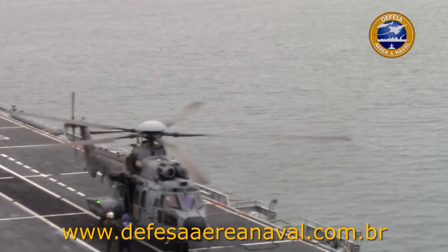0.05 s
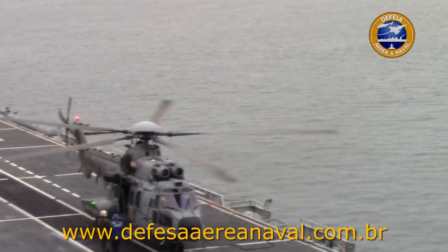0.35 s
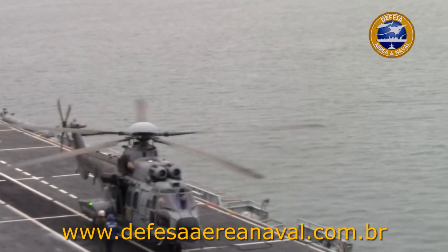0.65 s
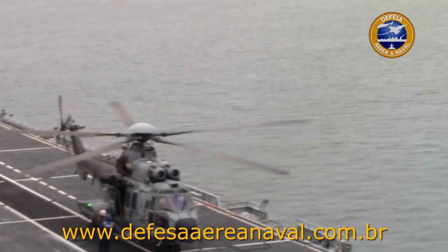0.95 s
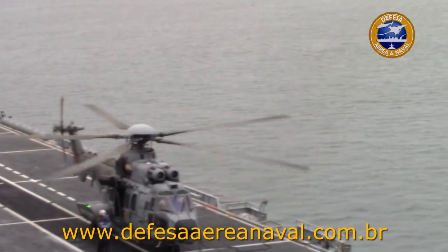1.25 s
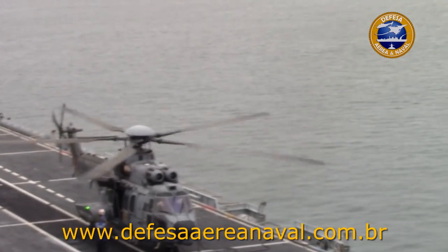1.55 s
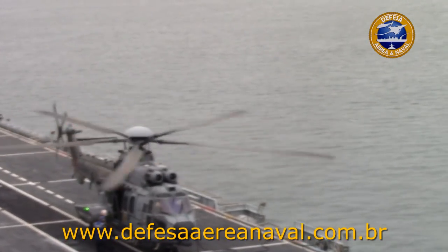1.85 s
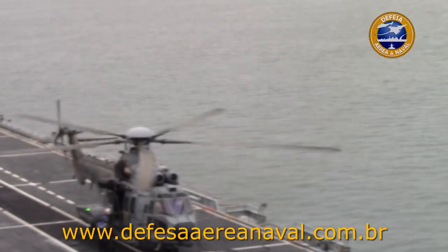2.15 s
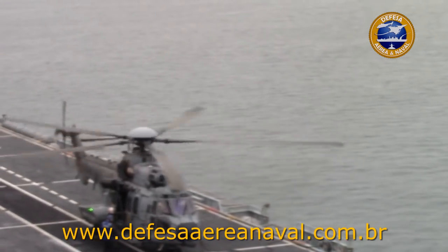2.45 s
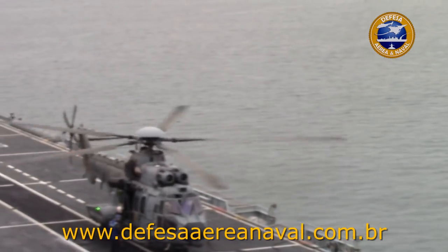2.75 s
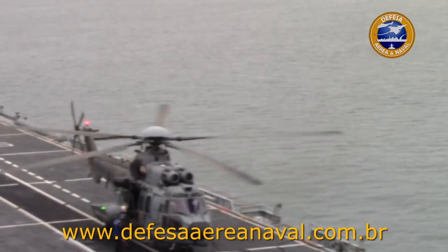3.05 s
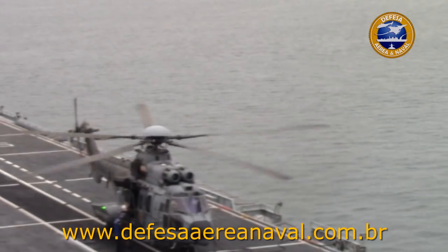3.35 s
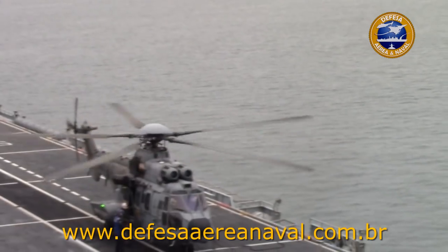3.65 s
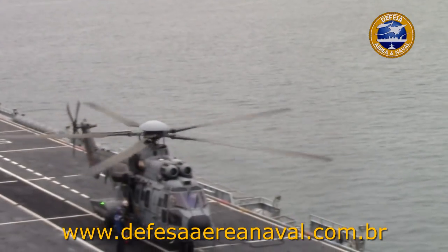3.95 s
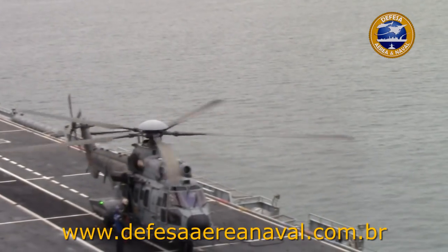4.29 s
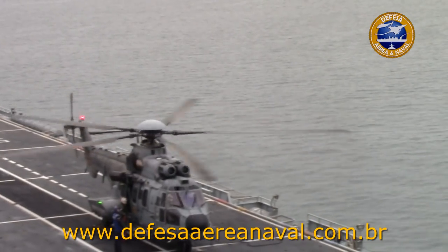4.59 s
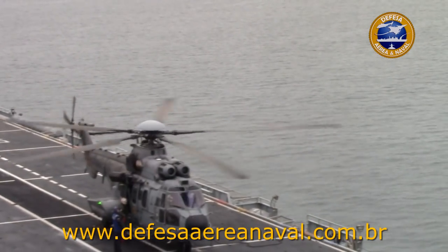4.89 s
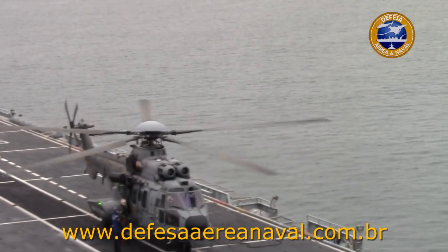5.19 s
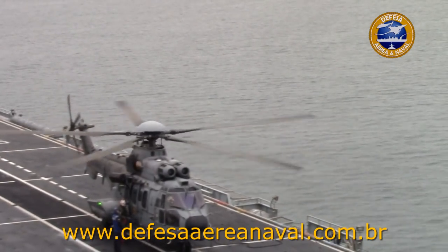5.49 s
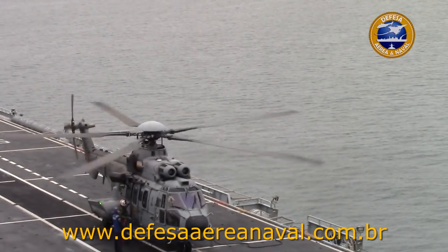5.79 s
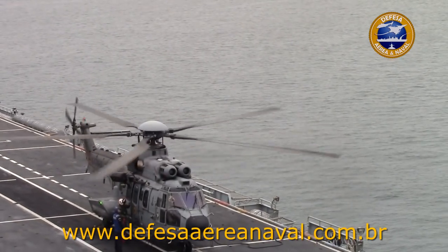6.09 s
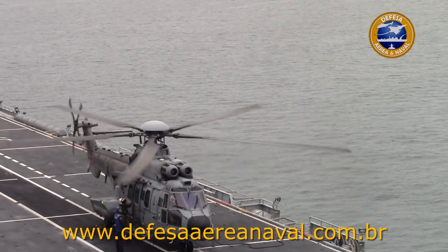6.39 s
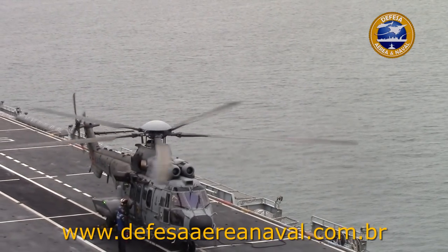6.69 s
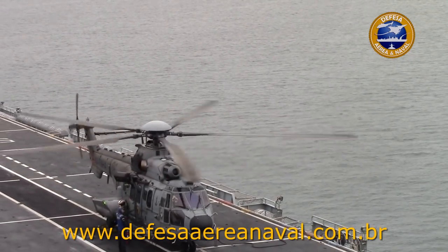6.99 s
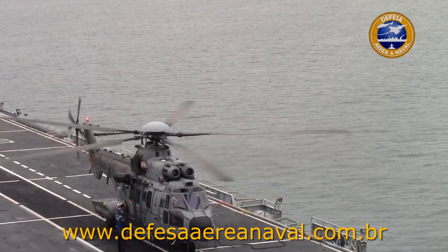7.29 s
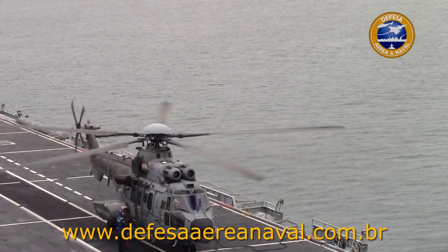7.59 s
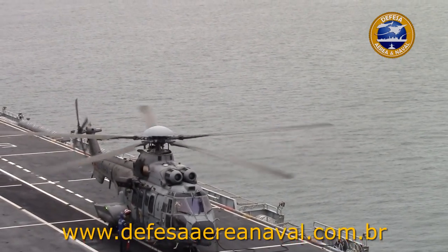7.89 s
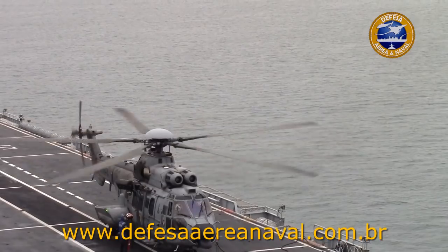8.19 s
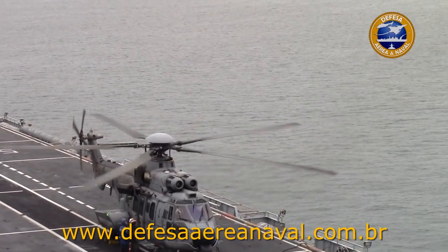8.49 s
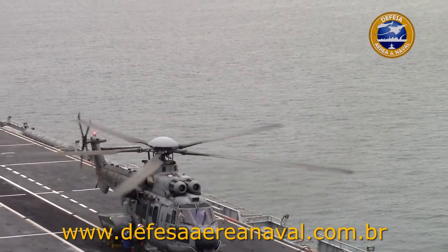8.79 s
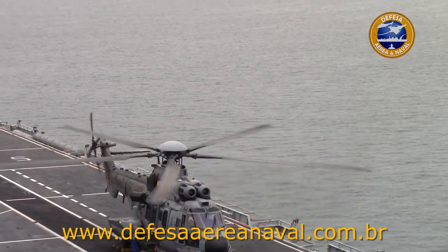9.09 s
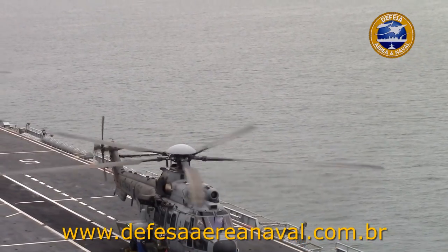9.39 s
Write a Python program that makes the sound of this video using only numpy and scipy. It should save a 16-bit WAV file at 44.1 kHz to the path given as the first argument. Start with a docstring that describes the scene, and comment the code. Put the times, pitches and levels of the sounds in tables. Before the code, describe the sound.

Outdoors on a flight deck, a big helicopter runs in place at a moderate distance from the microphone. A loud, continuous turbine rush carries a rapid rotor flutter and a piercing high whine that wavers in the moving air. Short whistling tones flare over the blades now and then. Past the middle, the rotor slaps more sharply for a couple of seconds, then eases while the engines keep running.

```python
"""Helicopter idling on a ship's deck.

A large twin-turbine machine, some way off. The exhausts roar, each main blade sweeps past
with a swish or a slap, and the rotors drone below. Air sings over the rotor; gears hum.
The compressors whine through gusty air; passing blades throw the whine back in raised chirps."""
import sys
import numpy as np
from scipy import signal
from scipy.fft import rfft, irfft, next_fast_len
from scipy.io import wavfile
from scipy.ndimage import uniform_filter1d, map_coordinates

SR = 44100
rng = np.random.default_rng(int(sys.argv[2]) if len(sys.argv) > 2 else 0)


def store_wav(level_fs):
    """Save 16-bit WAV to argv[1]."""
    pcm = np.round(np.clip(np.atleast_2d(level_fs), -1, 1) * 32767)
    wavfile.write(sys.argv[1], SR, pcm.T.astype(np.int16))


N = 425565
TIME_S = np.arange(N) / SR
BLADE_HZ, TAIL_HZ = 22.925, 88.5  # blade-pass rates: main rotor, tail rotor

# low roar, exhaust jets, turbine hiss: freq_hz, density_db
ROAR_SPECTRUM = [(130, -64), (190, -44), (300, -15.5), (470, -12.5), (570, -8.5), (680, -0.5), (830, -1.8),
                 (1080, -1), (1300, -1.5), (1700, -15.5), (3000, -69.5)]
JET_SPECTRUM = [(700, -59), (1250, -11.5), (1530, -0.5), (1830, -2), (2250, 0), (2950, -2.5), (3400, -2.5),
                (3750, -7.5), (4500, -12), (7000, -42)]
HISS_SPECTRUM = [(2000, -43), (3700, -3.5), (4600, -1.5), (5800, 0), (7200, -0.9), (8500, 0.3), (9300, 2),
                 (9900, -3), (11000, -7), (12500, -15), (14300, -23.5), (15500, -50)]
# envelope of low roar and rotor drone: time_s, level_db
LOW_ENVELOPE = [(0.0, -27.5), (0.2, -27.5), (0.45, -32.5), (1.07, -29.5), (1.42, -32), (1.8, -31.5),
                (2.55, -27.5), (3.3, -26.5), (4.15, -25.5), (4.75, -31), (5.4, -27.5), (6.1, -28),
                (6.2, -26), (6.35, -26.5), (7.0, -28.5), (7.68, -31.5), (8.03, -27), (8.4, -29),
                (8.72, -32), (9.2, -28.5), (9.65, -26)]
# part of the rush's power that comes in swishes: time_s, body_share, treble_share
SWISH_SHARE = [(0.0, .22, 0.2), (0.65, 0.16, .12), (1.0, .07, .15), (1.5, 0.11, 0.04), (2.25, 0.06, 0.15),
               (2.75, .12, .18), (3.05, .16, .12), (3.33, 0.22, .4), (3.75, .04, 0.26), (4.2, 0.22, 0.1),
               (4.52, 0.3, 0.3), (4.75, .16, .08), (5.05, .26, .26), (5.4, 0.16, .15), (6.25, 0.2, .16),
               (6.55, 0.45, 0.45), (7.25, .52, .45), (7.55, .22, .3), (7.85, 0.33, .19), (8.35, 0.34, 0.36),
               (8.7, 0.23, 0.2), (9.1, .1, 0.3), (9.45, .08, .1), (9.65, .15, .3)]
# early and late drift of the swishes: time_s, lag_periods
SWISH_DRIFT = [(0.0, .04), (2.8, .08), (3.35, .02), (4.0, .04), (5.0, .04), (5.25, -.04), (5.6, .04),
               (6.3, .06), (6.65, .115), (7.1, .025), (7.5, .01), (7.9, -.08), (8.2, -.01), (8.4, -.03),
               (9.05, .13), (9.65, .03)]
# compressor blade tones: time_s, first_engine_hz, second_engine_hz
COMPRESSOR_PITCH = [(0.0, 9276, 8834), (0.7, 9278, 8812), (1.2, 9272, 8814), (2.4, 9287, 8813),
                    (3.6, 9266, 8828), (6.0, 9273, 8830), (6.8, 9248, 8824), (7.8, 9238, 8824),
                    (8.8, 9254, 8826), (9.6, 9265, 8823)]


def amp(db):
    """Decibels to gain."""
    return 10 ** (np.asarray(db) / 20)


def unit(x):
    """Scale to rms 1."""
    return x / np.sqrt(np.mean(x ** 2) + 1e-20)


def along(points, hz):
    """Interpolate (freq_hz, value) points on a log axis."""
    freq_hz, values = np.transpose(points)
    return np.interp(np.log(hz + 1), np.log(freq_hz + 1), values)


def curves(rows):
    """One per-sample curve for each column after time_s."""
    time_s, *columns = np.transpose(rows)
    return [np.interp(TIME_S, time_s, column) for column in columns]


def bell(peak_s, length_s):
    """Bell of height 1, length_s wide at half height."""
    return np.exp2(-np.minimum((2 * (TIME_S - peak_s) / length_s) ** 2, 40))


def swells(rows):
    """Bell-shaped rise in dB per (peak_s, length_s, lift_db) row."""
    return sum(lift_db * bell(peak_s, length_s) for peak_s, length_s, lift_db in rows)


def bursts(rows, length_s):
    """Bell-shaped gain per (peak_s, level_db) row."""
    return sum(amp(level_db) * bell(peak_s, length_s) for peak_s, level_db in rows)


def wobble(rate_hz):
    """Smooth random curve, rate_hz knots a second."""
    knots = rng.standard_normal(int(N * rate_hz / SR) + 4)
    steps = np.linspace(0, len(knots) - 1, 10 * len(knots))
    return np.interp(TIME_S * rate_hz, steps, map_coordinates(knots, [steps], mode="mirror"))


def filtered(x, response):
    """Apply the gain response(hz)."""
    size = next_fast_len(N + SR // 4)
    return irfft(rfft(x, size) * response(np.fft.rfftfreq(size, 1 / SR)), size)[..., :N]


def rush(spectrum, patchy_db):
    """Stereo noise of rms 1; turbulence lifts and sinks patches of its spectrum."""
    # left-right likeness: freq_hz, correlation
    likeness = [(70, 0.9), (200, .99999), (900, 1), (1400, 1), (2000, 1), (4000, 0.932), (8000, 0.63),
                (12000, 0.5)]

    def mid_side_gains(hz):
        angle = np.arccos(np.clip(along(likeness, hz), -1, 1)) / 2
        return amp(along(spectrum, hz)) * [np.cos(angle), np.sin(angle)]

    bins = signal.stft(rng.standard_normal((2, N)), nperseg=1024)[2]
    patches = uniform_filter1d(rng.standard_normal(bins.shape[1:]), size=5, axis=0)
    patches = uniform_filter1d(patches, size=24, axis=1)
    pair = signal.istft(bins * amp(patchy_db * unit(patches)), nperseg=1024)[1][:, :N]
    mid, side = filtered(pair, mid_side_gains)
    return unit(np.array([mid + side, mid - side]))


def tone(hz, scatter, rate_hz):
    """Tone of rms 1: a direct part plus a part scattered by moving air."""
    phase = 2 * np.pi * np.cumsum(hz + np.zeros(N)) / SR
    in_phase = (1 + scatter * wobble(rate_hz)) * np.cos(phase)
    quadrature = scatter * wobble(rate_hz) * np.sin(phase)
    return unit(in_phase + quadrature)


def blade_pass(lag_periods, width_periods):
    """One bump per main blade, mean 1."""
    phase = 2 * np.pi * (BLADE_HZ * TIME_S - lag_periods)
    bump = np.exp((np.cos(phase) - 1) / (2 * np.pi * width_periods) ** 2)
    return bump / bump.mean()


def chop(share, lag_periods, width_periods):
    """Power of the blade strokes: crisp slap, softer wake, no two equal."""
    wake_share = 0.31
    slap = (1 - wake_share) * blade_pass(lag_periods, width_periods)
    wake = wake_share * blade_pass(lag_periods + 0.09, width_periods=0.18)
    return share * (slap + wake) * amp(0.76 * wobble(BLADE_HZ)) ** 2


def exhaust_and_swish(gust_db):
    """Broad engine rush; part of its power comes in one swish per main blade."""
    # exhaust jets and turbine hiss between gusts: time_s, level_db
    jet_envelope = [(0.0, -23), (0.26, -21.5), (0.5, -24.5), (0.7, -24.2), (0.95, -22.8), (1.1, -23),
                    (1.58, -21), (1.73, -24.5), (1.85, -20.5), (1.95, -21.5), (2.09, -20), (2.2, -22),
                    (2.45, -23.5), (3.2, -23), (3.37, -23), (3.55, -23.2), (3.66, -21.7), (3.85, -23.3),
                    (4.4, -21.8), (4.85, -22.7), (5.95, -24), (6.27, -22), (6.5, -23.5), (7.1, -23.5),
                    (7.7, -23.5), (8.0, -23), (8.17, -24), (8.33, -22.3), (8.52, -25.3), (8.85, -25.5),
                    (9.3, -23.5), (9.5, -22.5), (9.65, -24)]
    hiss_envelope = [(0.0, -24), (0.16, -23.2), (0.45, -26), (0.7, -24), (1.05, -22), (1.19, -20.5),
                     (1.4, -22), (1.78, -23.5), (2.1, -22.5), (3.3, -23), (3.9, -22), (4.5, -21.5),
                     (4.85, -22.8), (5.15, -21.5), (5.4, -22.5), (5.62, -21.5), (6.05, -23.3), (6.38, -21),
                     (6.7, -23.5), (7.25, -21.8), (8.05, -24), (8.5, -23.5), (8.78, -23.5), (9.22, -24),
                     (9.65, -22)]
    # blade swish: freq_hz, density_db
    swish_spectrum = [(200, -45), (480, -16.5), (670, -2.5), (870, -7.5), (1060, -1), (1300, -8),
                      (1550, 0.5), (1850, -5), (2300, -3.5), (2900, -3.5), (3400, -3.5), (4400, -12),
                      (7000, -40)]
    jet_db = curves(jet_envelope)[0] + 0.023 * gust_db
    hiss_db = curves(hiss_envelope)[0] + 0.11 * gust_db
    share, treble_share = np.clip(curves(SWISH_SHARE), 0, 0.8)
    lag_periods, = curves(SWISH_DRIFT)
    flutter = amp(0.22 * wobble(9))
    roar = amp(curves(LOW_ENVELOPE)[0] + 0.3) * rush(ROAR_SPECTRUM, patchy_db=1.1)
    jet = amp(jet_db + 1.53 + 0.26 * wobble(9.3)) * rush(JET_SPECTRUM, patchy_db=1.15)
    hiss = amp(hiss_db + 0.27 + 0.29 * wobble(7.2)) * rush(HISS_SPECTRUM, patchy_db=1.76)
    body_power = chop(share, lag_periods, width_periods=0.086)
    swish = amp(jet_db + 1.87) * np.sqrt(body_power) * rush(swish_spectrum, patchy_db=1)
    treble_power = 1 - treble_share + chop(treble_share, lag_periods + 0.025, width_periods=0.087)
    return flutter * (np.sqrt(1 - share) * (roar + jet) + swish + np.sqrt(treble_power) * hiss)


def rotor_drone(blade_hz, gain_db, half_width_hz):
    """Blade-rate harmonics, each blurred by the wind to a narrow, wavering line."""
    # outline of the harmonics: freq_hz, level_db
    outline = [(100, -90), (155, -28), (183, -12.5), (228, -4), (320, 1), (390, -1), (460, -5), (640, 3),
               (800, -2), (1200, -71.5)]

    def harmonics(hz):
        offset_hz = (hz + blade_hz / 2) % blade_hz - blade_hz / 2
        return amp(along(outline, hz)) / (1 + (offset_hz / half_width_hz) ** 2)

    return amp(curves(LOW_ENVELOPE)[0] + gain_db) * unit(filtered(rng.standard_normal(N), harmonics))


def compressors(gust_db):
    """Two engines whine at slightly different speeds, swelling in gusts; rotor wash frays the first."""
    # whine between gusts: time_s, first_engine_db, second_engine_db
    envelopes = [(0.0, -29, -40), (0.7, -31, -38), (1.5, -28.5, -33.5), (2.2, -29, -34), (3.0, -36, -34),
                 (3.6, -31.5, -39), (4.2, -29.5, -41), (7.0, -26.9, -41.5), (8.0, -28.2, -44),
                 (9.65, -29, -38)]
    # whine scattered by turbulence: freq_hz, density_db
    halo_spectrum = [(8300, -41.5), (8900, -6), (9150, -5), (9265, 3.5), (9400, -7), (9650, -19),
                     (10200, -46)]
    first_db, second_db = curves(envelopes)
    first_hz, second_hz = curves(COMPRESSOR_PITCH)
    first_hz += 5 * wobble(20)
    direct = 0.86 * tone(first_hz, scatter=0.42, rate_hz=55)
    frayed = 0.45 * np.array([tone(first_hz, scatter=4.2, rate_hz=130) for _ in range(2)])
    halo = amp(-8) * rush(halo_spectrum, patchy_db=1)
    first = amp(first_db + gust_db + 1.55 * wobble(28)) * (direct + frayed + halo)
    second_gain = amp(second_db + 0.7 * gust_db + 2 * wobble(13))
    second = second_gain * tone(second_hz + 4 * wobble(8), scatter=0.56, rate_hz=50)
    return (first + second) * amp([[1.2], [-1.2]])  # slightly left


def machinery():
    """Thin tones of gear meshes, most with one slow swell, and of further turbine stages."""
    # gear meshes: pitch_hz, level_db, peak_s, length_s, lift_db
    meshes = [(979, -46, 4.2, 1.6, 2), (1073, -47.5, 6.9, 1.0, 5), (1910, -43, 2.4, 1.2, 4),
              (2195, -42.5, 1.6, 1.5, 8), (2313, -43, 8.0, 2.5, 0)]
    # turbine stages: pitch_hz, level_db
    stages = [(7490, -45), (7880, -44.5)]
    gears = sum(amp(db + lift_db * bell(peak_s, length_s)) * tone(hz, scatter=0.58, rate_hz=7)
                for hz, db, peak_s, length_s, lift_db in meshes)
    turbine = sum(amp(db) * tone(hz + 10 * wobble(2), scatter=0.99, rate_hz=35) for hz, db in stages)
    return gears + turbine


def wind(gust_db):
    """Faint, lumpy buffeting at the microphone, rising with each gust."""
    # wind rumble: freq_hz, density_db
    spectrum = [(15, -7), (60, -4), (110, -5), (160, 7), (300, -32)]
    return amp(-91 + gust_db + 6.4 * wobble(10)) * rush(spectrum, patchy_db=0)


def blade_glints():
    """An advancing blade briefly mirrors the whine, raised by its speed and falling as it turns."""
    # runs of louder glints: peak_s, length_s, lift_db
    runs = [(0.05, 0.57, 8), (1.25, .3, 6), (4.45, 0.62, 13), (5.05, .3, 6), (5.52, .45, 15), (6.9, 1.0, 6),
            (8.9, 0.56, 17), (9.65, 0.53, 19.5)]
    lag_periods, doppler_hz, fall_hz_per_period = 0.836, 160, 500
    since_periods = (BLADE_HZ * TIME_S - lag_periods + 0.5) % 1 - 0.5
    shift_hz = doppler_hz + 45 * wobble(12) - fall_hz_per_period * since_periods
    pitch_hz = curves(COMPRESSOR_PITCH)[0] + shift_hz
    flash = np.sqrt(blade_pass(lag_periods, width_periods=0.038)) * amp(2.1 * wobble(BLADE_HZ))
    return amp(-45.5 + swells(runs)) * flash * tone(pitch_hz, scatter=1.4, rate_hz=300)


def blade_whistle():
    """Air sings over the rotor in two bands, the lower with a wandering core; passing blades ping."""
    # singing bands: freq_hz, density_db
    lower_spectrum = [(2600, -59), (3020, -10), (3160, 1.5), (3400, 1.5), (3650, -28), (4200, -55.5)]
    upper_spectrum = [(3450, -50), (3790, -5), (4000, 5), (4230, -10), (4800, -48)]
    # flares of the singing: peak_s, length_s, lower_lift_db, upper_lift_db
    flares = [(0.21, 0.2, 13.5, 14.5), (0.748, 0.094, 5, 13), (1.0, .15, 9.5, 4), (1.154, 0.071, 12, 5),
              (1.472, 0.26, 5, 4), (1.88, .12, 7, 2), (2.088, 0.18, 13, 10), (2.68, .35, 5, -1),
              (3.55, .14, 7.5, 2), (4.47, 0.13, 12, 9), (4.629, 0.12, 5, 3), (5.06, 0.16, 7, 5),
              (5.51, 0.1, 11, 7), (5.655, 0.11, 12.5, 4.5), (7.55, 0.31, 7, 5), (8.34, 0.195, 2.5, 6)]
    # pitch of core and pings: time_s, pitch_hz
    core_pitch = [(0.2, 3330), (1.0, 3320), (1.5, 3400), (2.1, 3280), (3.55, 3265), (4.6, 3370),
                  (4.93, 3370), (5.1, 3265), (5.65, 3210), (6.85, 3420), (7.15, 3400), (7.6, 3310),
                  (9.65, 3350)]
    # runs of louder pings: peak_s, length_s, lift_db
    ping_runs = [(0.15, .35, 7), (2.68, 0.41, 10.5), (5.05, .2, 16), (7.1, .45, 10), (7.58, 0.3, 9),
                 (8.8, .3, 9)]
    # loudest single pings: peak_s, level_db
    loud_pings = [(2.398, -25), (2.706, -20.5), (4.579, -20), (4.887, -22), (4.932, -21.5), (5.105, -18),
                  (5.646, -23), (6.849, -22), (6.891, -24), (7.068, -22), (7.112, -22.5), (7.503, -24)]
    peak_s, length_s, lower_lift_db, upper_lift_db = np.transpose(flares)
    lower_db = swells(zip(peak_s, length_s, lower_lift_db))
    upper_db = swells(zip(peak_s, length_s, upper_lift_db))
    pitch_hz, = curves(core_pitch)
    lower = amp(-38 + lower_db) * rush(lower_spectrum, patchy_db=1.5)
    core = amp(-43 + lower_db) * tone(pitch_hz + 30 * wobble(14), scatter=2.7, rate_hz=210)
    upper = amp(-39.5 + upper_db) * rush(upper_spectrum, patchy_db=2)
    gate = np.sqrt(blade_pass(lag_periods=0.04, width_periods=0.08)) * amp(2.1 * wobble(BLADE_HZ))
    ping_gain = np.hypot(amp(-42.5 + swells(ping_runs)) * gate, bursts(loud_pings, length_s=0.013))
    pings = ping_gain * tone(pitch_hz + 25 * wobble(15), scatter=0.55, rate_hz=220)
    return lower + core + upper + pings


def hollow_tones():
    """Narrow resonances rise out of the roar and sink back, pulsing with the blades."""
    # resonances: peak_s, length_s, pitch_hz, width_hz, level_db
    resonances = [(0.17, .3, 1070, 110, -36.5), (2.7, 0.28, 2250, 94, -34), (4.25, 0.54, 1570, 220, -31),
                  (6.38, 0.53, 1470, 75, -32.5), (7.74, 1.5, 1510, 65, -35), (6.85, 1, 1665, 80, -36.5),
                  (7.0, .8, 1055, 90, -34.5), (8.1, 0.43, 1070, 125, -36), (7.4, 2.4, 665, 60, -39)]
    share = np.clip(1.4 * curves(SWISH_SHARE)[0], 0, 0.8)
    pulse = np.sqrt(1 - share + chop(share, curves(SWISH_DRIFT)[0], width_periods=0.11))
    return pulse * sum(amp(db) * bell(peak_s, length_s) ** 0.5 * tone(hz, scatter=3.4, rate_hz=width_hz)
                       for peak_s, length_s, hz, width_hz, db in resonances)


def hard_slaps():
    """A blade cuts the wake of the one before and slaps harder: dull, full or crisp."""
    # hardest slaps: peak_s, thump_db, body_db, crack_db
    slaps = [(4.156, -24, -32, -40), (6.198, -20, -28, -40), (6.549, -33, -24, -28), (6.679, -28, -28, -21),
             (6.764, -25, -33, -38), (7.065, -36, -33, -25), (7.110, -38, -33, -22), (8.024, -22, -31, -40),
             (8.288, -34, -21, -26), (8.332, -34, -21, -33)]
    peak_s, *levels_db = np.transpose(slaps)
    return sum(bursts(zip(peak_s, band_db), length_s=0.014) * rush(spectrum, patchy_db=1.5)
               for band_db, spectrum in zip(levels_db, (ROAR_SPECTRUM, JET_SPECTRUM, HISS_SPECTRUM)))


def scene():
    """The whole helicopter through gusty air."""
    # gusts that carry the treble over: peak_s, length_s, whine_lift_db
    gusts = [(0.16, 0.38, 9.5), (0.5, 0.14, 8.5), (0.91, 0.2, 9), (1.17, 0.12, 6.5), (1.32, 0.14, 8.5),
             (2.02, 0.14, 1.5), (4.46, 0.1, 8.5), (4.65, 0.13, 9.5), (5.65, 0.1, 4), (5.9, 0.14, 4),
             (6.3, 0.217, 7), (6.59, 0.055, 4), (6.80, 0.065, 7.5), (7.1, 0.26, 2.5), (7.57, 0.14, 8),
             (8.33, .16, 5), (8.78, 0.23, 11.5), (9.0, 0.15, 2), (9.5, 0.15, 5)]
    gust_db = swells(gusts)
    main_rotor = rotor_drone(BLADE_HZ, gain_db=-11, half_width_hz=2.7)
    tail_rotor = rotor_drone(TAIL_HZ, gain_db=-22, half_width_hz=2.6)
    turbines = compressors(gust_db) + blade_glints() + machinery()
    airflow = exhaust_and_swish(gust_db) + hard_slaps() + hollow_tones() + blade_whistle()
    return airflow + main_rotor + tail_rotor + turbines + wind(gust_db)


def record(dry):
    """Brick-wall low-pass."""
    return filtered(dry, lambda hz: hz < 15700)


dry = scene()
out = record(dry)
store_wav(out)
```